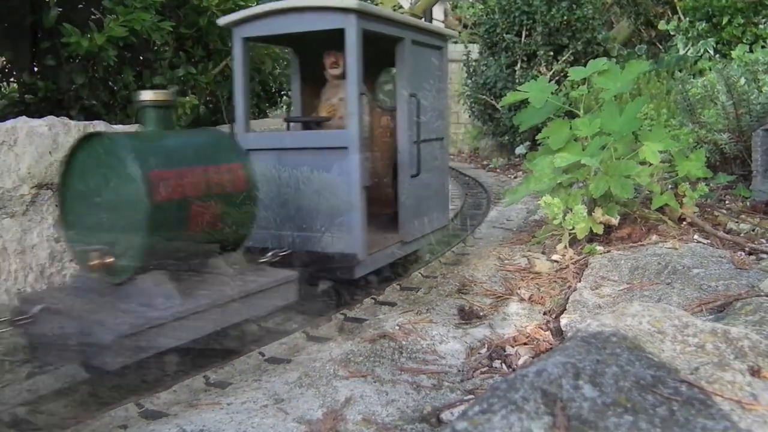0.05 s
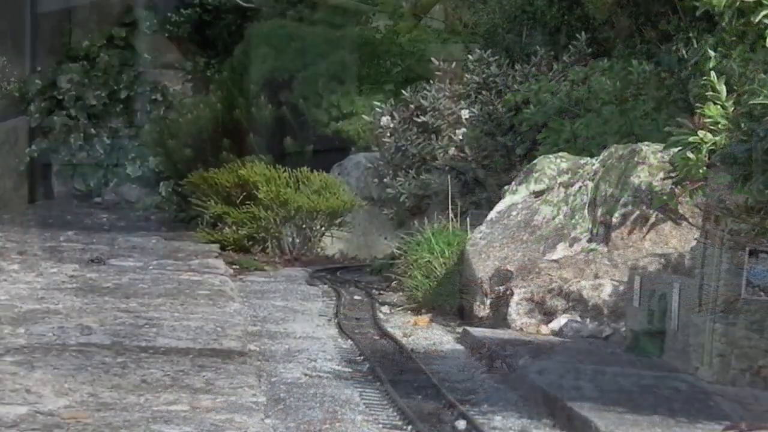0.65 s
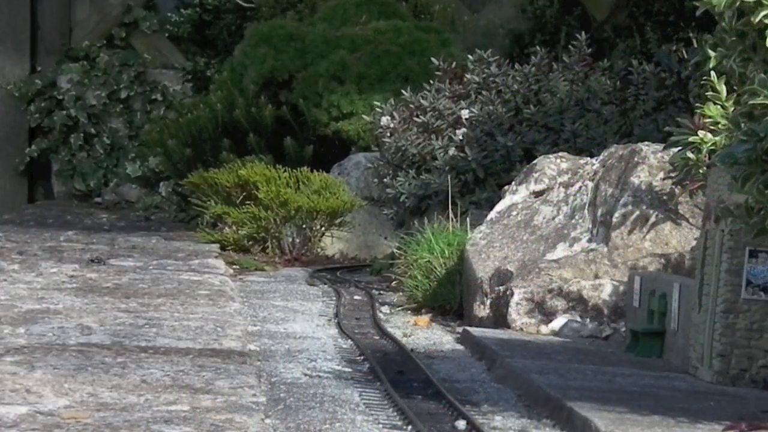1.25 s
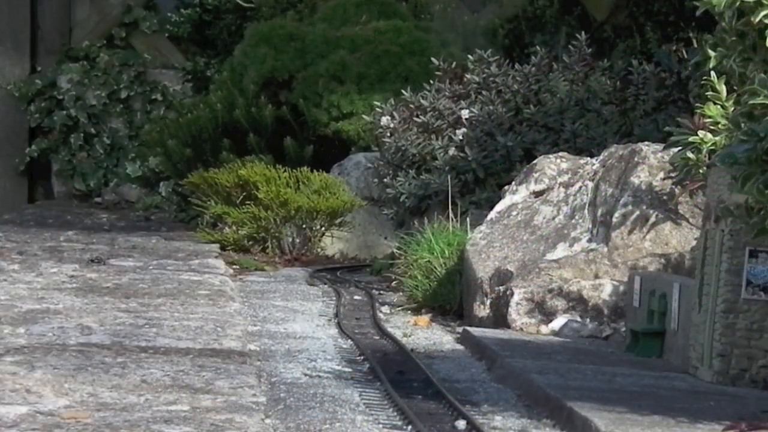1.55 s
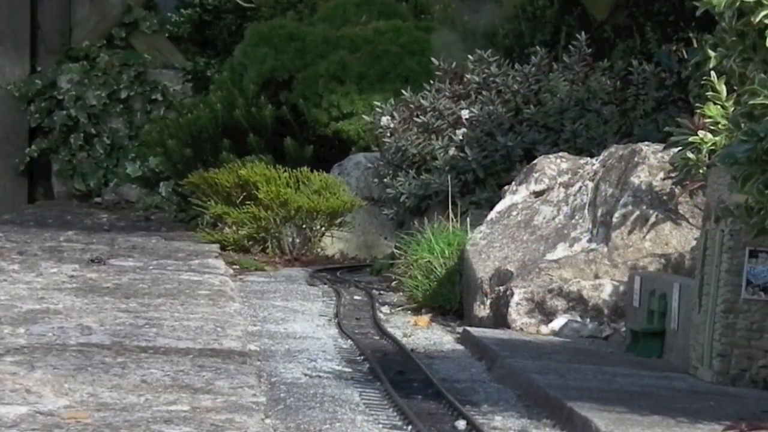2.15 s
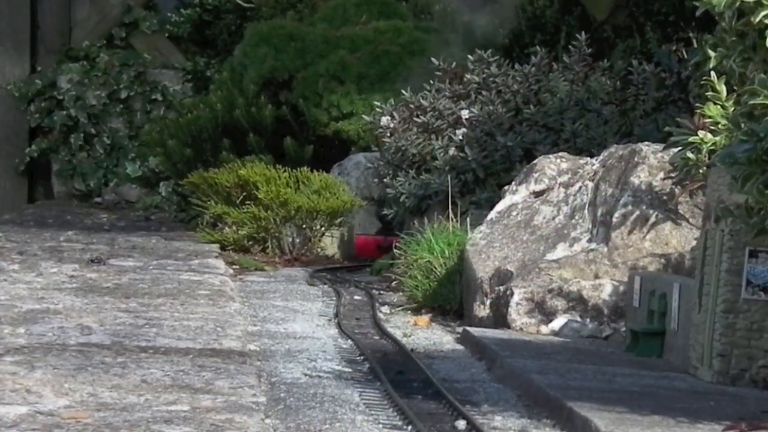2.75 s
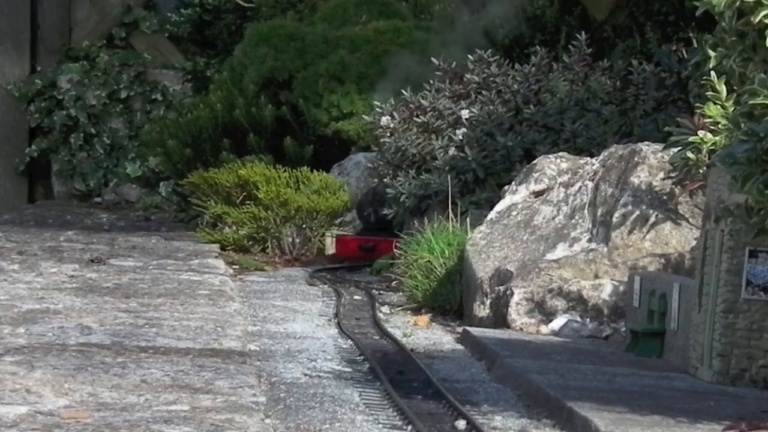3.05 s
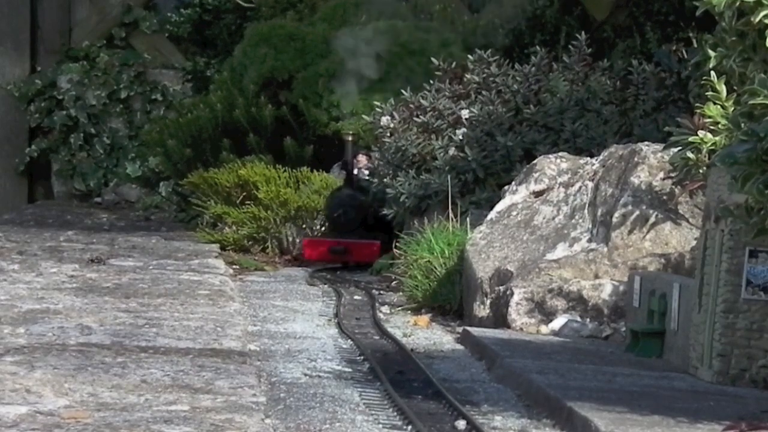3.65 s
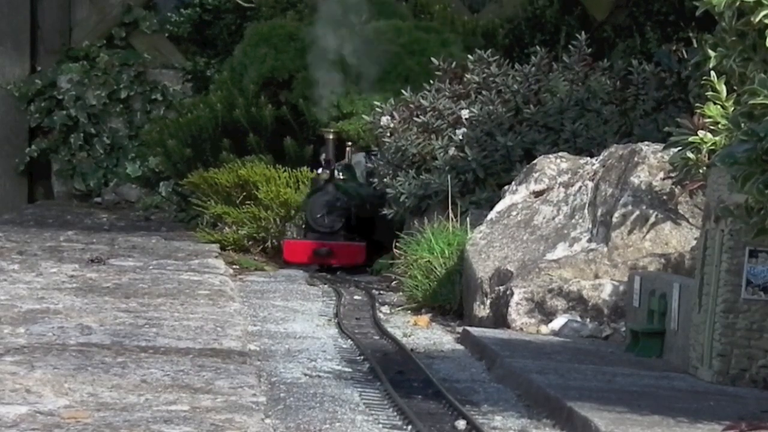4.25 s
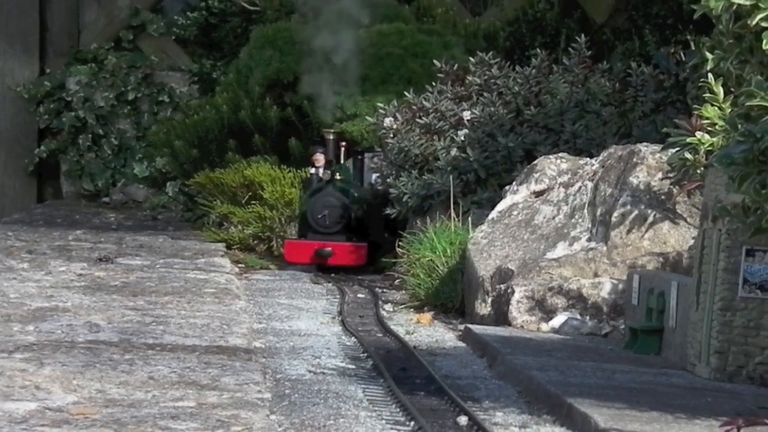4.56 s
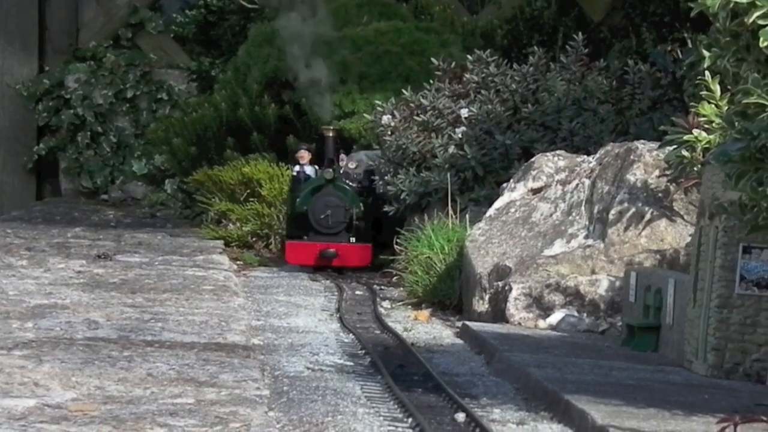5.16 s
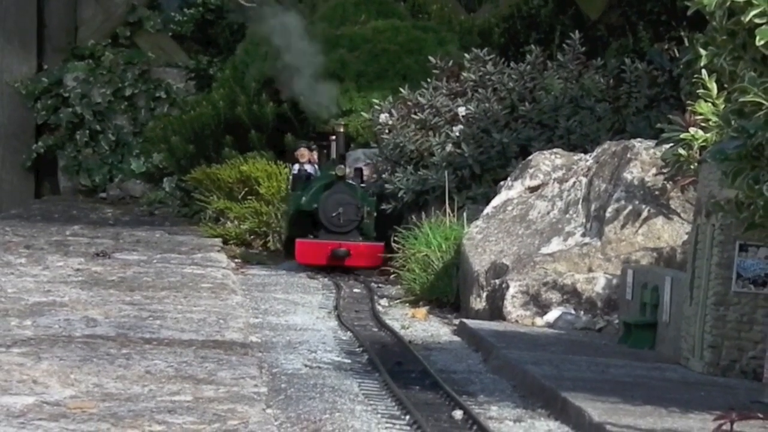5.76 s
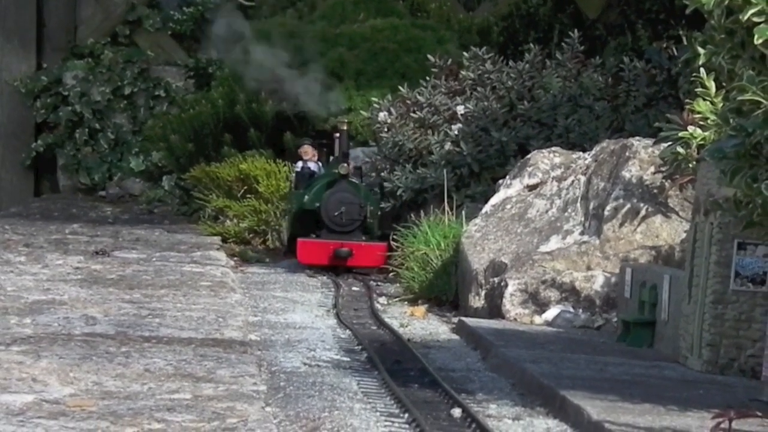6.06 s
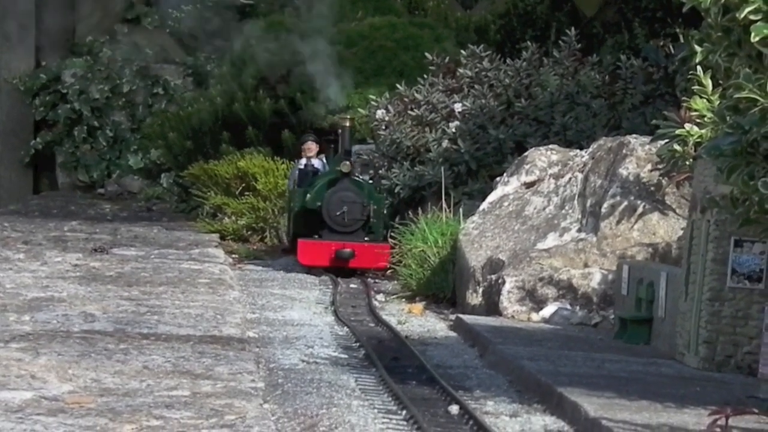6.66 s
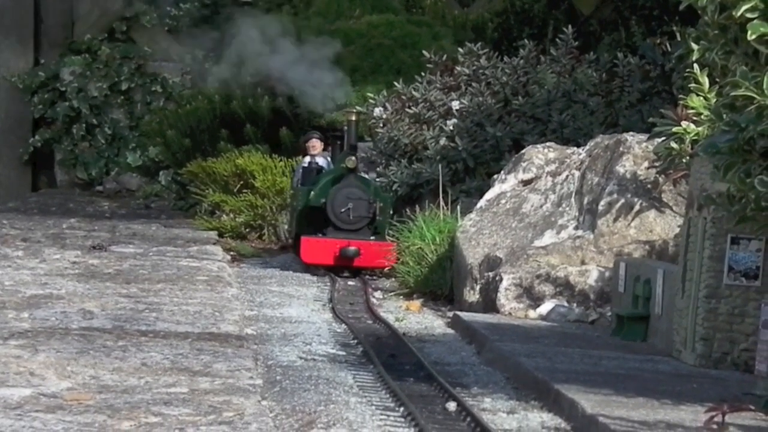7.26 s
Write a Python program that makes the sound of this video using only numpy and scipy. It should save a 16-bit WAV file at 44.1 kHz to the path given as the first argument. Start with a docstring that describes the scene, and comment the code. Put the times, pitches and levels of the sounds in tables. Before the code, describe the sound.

Quick, light, hissy chuffs of a miniature steam engine grow gradually louder along a garden track, over a fluttering burner and occasional water spits.

```python
"""A small live-steam locomotive runs on a garden railway. At first it sounds hollow and lies to the left: a
wheel knocks on a rail joint, wagons rumble and a flange rings. Within a second the scene dissolves into
another, where it is dead ahead and approaching, four chuffs to a wheel turn, each a turbulent steam jet that
hisses and excites the chimney's resonances. From about two seconds the whistling gas burner flutters strongly
and water spits at times. The chuffs grow louder towards the end. Throughout, stone scatters the sound over
quiet outdoor air."""
import sys
import numpy as np
from scipy import signal
from scipy.fft import rfft, irfft
from scipy.io import wavfile
from scipy.ndimage import uniform_filter1d

SR = 44100
rng = np.random.default_rng(int(sys.argv[2]) if len(sys.argv) > 2 else 0)


def to_wav(sig):
    """Store sig (one row per channel, or 1-D mono) as 16-bit WAV at the path in sys.argv[1].

    Samples outside -1..1 are clipped; the rate is SR.
    """
    pcm = np.clip(np.atleast_2d(sig), -1, 1) * 32767
    pcm = np.round(pcm).astype(np.int16)
    wavfile.write(sys.argv[1], SR, pcm.T)  # frames by channels


N = 322812
T, HZ = np.arange(N) / SR, np.fft.rfftfreq(N, 1 / SR)


# chimney resonances: centre_hz, width_hz, level_db
CHIMNEY_MODES = [(1477, 147, 1), (1774, 230, 2.5), (2150, 93, -1.5), (2720, 530, -4), (3034, 680, -4.5)]
# the blast nozzle's thin sizzle: centre_hz, width_hz, level_db
NOZZLE_MODES = [(9130, 850, 9), (10250, 400, -19)]
# broad rush of the blast: frequency_hz, density_db
BLAST_SPECTRUM = [(300, -36), (650, -17), (790, -14.5), (950, -8.5), (1200, -6.5), (1500, 3.5), (2300, 3),
                  (3000, -2.5), (3700, -3.5), (5000, -5), (6500, -34)]
# hiss of the jet: frequency_hz, density_db
JET_SPECTRUM = [(2500, -16), (4300, -11), (5100, 5), (6000, 1), (7400, 0.5), (8400, -5.5), (9200, 0),
                (9700, -2), (10600, 3.5), (11500, -6.5), (12700, -7), (14200, -16), (15500, -15)]
# note and sizzle as the engine comes out from behind rocks: time_s, gain_db
EXPOSURE = [(0, 0), (2, 2), (3.5, -2), (4.7, 1.5), (6, -0.5), (7.3, 3)]

def chuffs(times, valves, chimney_db, hiss_db, note_hz):
    """Jet noise: pulses of wet, turbulent steam hiss and drive the chimney's air column."""
    sputter, exposure = wander(hz=130), amp(over_time(EXPOSURE))
    gulps = amp(1.6 * sputter)
    spray = amp(.8 * sputter + 1.2 * wander(hz=500))
    rush_db = (chimney_db + hiss_db) / 2
    ring_flow = steam_flow(times - .0032, valves, chimney_db, quick=1.18, hold=1.23, fall=1.2, shut_s=.075)
    rush_flow = steam_flow(times - .0019, valves, rush_db, quick=1.8, hold=1.03, fall=.77, shut_s=.22)
    jet_flow = steam_flow(times - .0042, valves, hiss_db, quick=.82, hold=1.04, fall=1.1, shut_s=.23)
    ring = amp(1) * resonant_noise(CHIMNEY_MODES) + amp(-.5) * exposure * chimney_note(times, note_hz)
    sizzle = amp(-5 + 3.5 * wander(hz=13)) * exposure * resonant_noise(NOZZLE_MODES)
    hiss = amp(4.5) * broad_noise(JET_SPECTRUM) + sizzle
    rush = amp(3.5) * broad_noise(BLAST_SPECTRUM)
    return ring_flow * ring + rush_flow * gulps * rush + jet_flow * spray * hiss


def chimney_note(times, note_hz, waver_hz=45, pan_db=1.5):
    """Pipe resonance: each blast sounds the chimney like a badly blown pipe, at its own pitch."""
    beat = np.maximum(np.searchsorted(times, T) - 1, 0)
    pitch_hz = note_hz[beat] + waver_hz * wander(hz=143)
    note = sine(pitch_hz) * amp(3.3 * wander(hz=70))
    return unit(note) * amp([[-pan_db], [pan_db]])


# the four valves, nominal values: rise_s, open_s, fall_db_per_s, chimney_accent_db, hiss_accent_db
VALVE_STROKES = [(0.0036, 0.027, 233, 0, 0), (0.003, 0.032, 235, -0.86, -2), (0.0041, 0.018, 257, 0.2, 2),
                 (0.0036, 0.024, 244, -2.5, -4)]

def steam_flow(times, valves, levels_db, quick, hold, fall, shut_s):
    """Blowdown: a valve opens, then flow decays as the cylinder empties; beats add in power."""
    power, t = np.zeros(N), np.arange(SR // 6) / SR
    for start_s, valve, level_db in zip(times, valves, levels_db):
        rise_s, open_s, fall_db_per_s, _, _ = VALVE_STROKES[valve]
        crispness = np.interp(start_s, [0, .8, 2], [.5, .4, 1.1])  # a hidden engine has softer edges
        opening = (1 - np.exp(-quick * crispness * t / rise_s)) ** 2
        emptying_db = -fall * fall_db_per_s * np.maximum(t - hold * open_s, 0) - 6 * (t / shut_s) ** 4
        add(power, start_s, (opening * amp(level_db + emptying_db)) ** 2)
    return np.sqrt(power)


# crank positions at which the valves open: angle_turns
VALVE_PHASES = [0, .2436, .5032, .7743]

def valve_openings(speed, start_turns):
    """Wheel angle is the integral of speed; each valve angle passed gives one (time_s, valve)."""
    t = T[(T >= speed[0][0]) & (T < speed[-1][0])]
    turns = start_turns + np.cumsum(np.interp(t, *np.transpose(speed))) / SR
    return [(np.interp(turn + angle, turns, t), valve)
            for turn in range(int(turns[-1]) + 1)
            for valve, angle in enumerate(VALVE_PHASES) if start_turns < turn + angle < turns[-1]]


# driving wheels in two scenes that dissolve into each other, the first receding, the second approaching:
# time_s, turns_per_s
RECEDING_SPEED = [(0, 2.77), (.55, 2.77)]
APPROACH_SPEED = [(0.55, 2.647), (1.1, 2.962), (1.35, 2.674), (1.55, 2.837), (2.15, 2.854), (2.35, 3.07),
                  (2.5, 2.653), (3.4, 3.013), (3.7, 2.694), (3.8, 2.894), (4.5, 3.12), (4.6, 2.832),
                  (4.9, 3.025), (5.05, 2.775), (5.2, 3.048), (5.75, 2.947), (6.35, 2.979), (7.32, 2.727)]
# the exhaust along the run: time_s, chimney_db, hiss_db, pitch_hz
EXHAUST_TREND = [(0, -33.5, -35.5, 1770), (0.301, -34.5, -37, 1700), (.55, -31.5, -38, 1750),
                 (.95, -31, -39.2, 1820), (1.5, -32, -37, 1880), (1.9, -30, -36.7, 1795),
                 (2.35, -35.5, -36, 1840), (2.6, -29.5, -37.5, 1750), (3.799, -28.5, -36, 1760),
                 (4.8, -26.5, -35, 1805), (5.6, -25.5, -34.5, 1770), (6.7, -25, -34, 1790),
                 (7.3, -28, -35, 1790)]

def exhaust_beats(spread_db=1.0, spread_hz=30):
    """A quasi-periodic pulse train: the valves set rhythm and accent; strength and pitch vary by chance."""
    openings = valve_openings(RECEDING_SPEED, .432) + valve_openings(APPROACH_SPEED, .39)
    times, valves = map(np.array, zip(*openings))
    trend_s, *columns = np.transpose(EXHAUST_TREND)
    chimney_db, hiss_db, note_hz = (np.interp(times, trend_s, column) for column in columns)
    *_, chimney_accent, hiss_accent = np.array(VALVE_STROKES)[valves].T
    force, detune = rng.standard_normal((len(times), 2)).T
    chimney_db += chimney_accent + spread_db * force
    hiss_db += hiss_accent + spread_db * force / 2
    return times, valves, chimney_db, hiss_db, note_hz + spread_hz * detune


# slugs of water in the blast pipe: peak_s, level_db
WATER_SLUGS = [(1.927, -18), (2.015, -18), (2.630, -17.5), (4.61, -16.5), (5.287, -16), (5.618, -16),
               (6.056, -12), (6.296, -20), (6.812, -12), (7.166, -10), (7.193, -17)]

def spits(swell_s=.0016, splash_db=-10):
    """Impulse excitation: a bursting slug of water splashes and briefly rings the strongest chimney mode."""
    tone, bursts, t = np.zeros(N), np.zeros(N), np.arange(SR // 30) / SR
    shape = (t / swell_s) ** 2 * np.exp(-t / swell_s)
    for time_s, level_db in WATER_SLUGS:
        detune, phase = rng.standard_normal(2)
        pitch_hz = CHIMNEY_MODES[1][0] * (1 + .035 * detune)
        pop = amp(level_db) * shape / shape.max()
        add(bursts, time_s - swell_s, pop)
        add(tone, time_s - swell_s, pop * np.sin(2 * np.pi * (pitch_hz * t + phase)))
    return tone + amp(splash_db) * bursts * broad_noise(BLAST_SPECTRUM)


# the flame's strength: time_s, level_db
FLAME_LEVEL = [(0, -31.5), (.6, -37), (1.1, -34), (1.7, -33.5), (2.1, -29.5), (3, -29.5), (4, -28.5),
               (5, -29), (5.8, -29.5), (6.3, -29.5), (7.3, -26.5)]
# its flutter: time_s, rate_hz, depth_fraction
FLAME_FLUTTER = [(0, 33.7, .3), (1.5, 35.44, 0), (2.1, 39.12, 0.7), (2.5, 37.58, 0.9), (3, 39.7, 0.6),
                 (3.6, 39.02, 0.99), (4.7, 41.13, 0.87), (5.4, 39, 0.82), (6, 39.2, 0.83), (7.3, 39, 0.84)]
# its roar: frequency_hz, density_db
ROAR_SPECTRUM = [(600, -20), (1200, -17.5), (1500, -4), (2000, -1), (2300, 2), (3200, 2.5), (3900, -9.5),
                 (5300, -10), (6000, -17), (7500, -16), (10500, -22.5), (15000, -40)]
# flue resonances: centre_hz, width_hz, level_db
FLUE_MODES = [(1820, 420, -6.5), (2757, 260, 1.5), (4810, 430, -8.5)]

def burner(flare_turns=.23, steady=.26, flue_db=-1):
    """Combustion noise: the flame roars in the resonant flue and flares about forty times a second."""
    time_s, rate_hz, depth = np.transpose(FLAME_FLUTTER)
    turns = np.cumsum(np.interp(T, time_s, rate_hz) * (1 + .0344 * wander(hz=13.1))) / SR
    flares = unit(steady + uniform_filter1d(np.exp(-(turns % 1) / flare_turns), size=90))
    depth = np.interp(T, time_s, depth)
    flutter = 1 - depth + depth * flares
    flicker = amp(.9 * wander(hz=160))
    roar = unit(broad_noise(ROAR_SPECTRUM) + amp(flue_db) * resonant_noise(FLUE_MODES))
    return amp(over_time(FLAME_LEVEL)) * flutter * flicker * roar


def draught(times, delay_s=.055, width_s=.017, sag_db=2.5):
    """Amplitude modulation: the draught of each blast briefly starves the flame."""
    sag, t = np.zeros(N), np.arange(SR // 8) / SR
    for start_s in times:
        add(sag, start_s, np.exp(-((t - delay_s) / width_s) ** 2))
    return amp(-sag_db * sag)


# the gas jet's strength: time_s, level_db
GAS_LEVEL = [(0, -40), (.7, -41), (1.05, -46), (1.2, -38), (1.7, -45.5), (2.2, -44), (2.7, -45),
             (3.1, -39.5), (4.5, -56), (6, -43), (7.3, -40)]
# its whistle: centre_hz, width_hz, level_db
WHISTLE_BANDS = [(4630, 590, -4.5), (5240, 760, -4), (10460, 2100, -13.5)]

def gas_jet(sing_hz=4710, stray_hz=99.4, quiver_hz=45, sing_db=-6.5):
    """Aerodynamic whistle: narrow bands of noise, with a thin, wavering tone that comes and goes."""
    whistle = amp(1.1 * wander(hz=25) + 2.3 * wander(hz=10)) * resonant_noise(WHISTLE_BANDS)
    pitch_hz = sing_hz + stray_hz * wander(hz=4) + quiver_hz * wander(hz=142)
    fitful_db = 7 * np.tanh(wander(hz=5)) + 3.3 * wander(hz=60)
    singing = unit(sine(pitch_hz) * amp(fitful_db))
    return amp(over_time(GAS_LEVEL)) * (whistle + amp(sing_db) * singing)


# wagon wheels and engine wheels on the rails: time_s, level_db
WAGON_LEVEL = [(0, -30.5), (.25, -32.5), (.5, -36), (.75, -36.5), (1, -51), (1.3, -77)]
ENGINE_LEVEL = [(0, -54), (2, -57.5), (4, -56), (5.5, -52), (6.2, -48.5), (6.6, -44), (6.9, -44),
                (7.1, -39), (7.3, -46)]
# the wagons' rumble: frequency_hz, density_db
RUMBLE_SPECTRUM = [(60, -36), (150, -8), (300, -5), (440, -6), (540, -11), (780, -13), (950, -2.5),
                   (1400, 1), (3000, -2.5), (8000, -16)]
# resonances of wagon wheels and engine frame: centre_hz, width_hz, level_db
WHEEL_MODES = [(451, 52, -0.5), (604, 120, 1), (743, 200, 3.5)]
FRAME_MODES = [(130, 120, -21), (221, 31, 3), (333, 54, 0), (470, 400, -8), (617, 110, 0.5), (785, 77, 2),
               (1090, 250, -5.5)]

def rolling():
    """Rolling noise: uneven contact with the rails excites wheels and frame."""
    bumps = amp(1.2 * wander(hz=35))
    rumble = unit(broad_noise(RUMBLE_SPECTRUM) + amp(-9.5) * resonant_noise(WHEEL_MODES))
    wagons = amp(over_time(WAGON_LEVEL)) * rumble
    engine = amp(over_time(ENGINE_LEVEL)) * resonant_noise(FRAME_MODES)
    return bumps * (wagons + engine)


# a wagon wheel meets a rail joint: start_s, level_db
RAIL_JOINT = (.0185, -14.5)

def joint_knock(decay_s=.0046):
    """Impact noise: the wheel's blow is a broadband burst that decays exponentially."""
    start_s, level_db = RAIL_JOINT
    age = np.maximum(T - start_s, 0) / decay_s
    envelope = amp(level_db) * (age > 0) * np.exp(-age)
    return envelope * broad_noise([(100, -22), (400, -2), (3000, 2), (9000, -28)])


# a flange rubbing the curved rail: time_s, level_db
FLANGE_LEVEL = [(0, -60), (.28, -55), (.38, -42), (.5, -48), (.68, -48), (.78, -66), (1.2, -100)]

def flange(pitch_hz=597, waver_hz=9):
    """Friction-driven vibration: a wagon wheel sings one unsteady note through the curve."""
    note = sine(pitch_hz + waver_hz * wander(hz=25))
    return amp(over_time(FLANGE_LEVEL) - 2 * wander(hz=30)) * note


# the opening's colour, hollow with the highest treble cut away: frequency_hz, gain_db
HOLLOW_RESPONSE = [(900, 3), (1200, -8.5), (1550, 6), (1800, 0), (2100, 1), (3200, -5.5), (4700, -2),
                   (7000, 1.5), (11000, -4), (14500, -34)]
# how much of the train has that colour: time_s, share_fraction
HOLLOW_SHARE = [(0, 1), (.3, .8), (.55, .35), (.8, 0)]

def hollow_opening(train, left_db=4):
    """Filtering and crossfade: for the first moments the train is hollow, dull on top and to the left."""
    share = over_time(HOLLOW_SHARE)
    hollow = irfft(rfft(train) * amp(over_hz(HOLLOW_RESPONSE)), N)
    panned = hollow * amp([[left_db / 2], [-left_db / 2]])
    return share * panned + (1 - share) * train


def rocks(train, count=3):
    """Specular reflection: small stone faces mirror the treble along paths that drift as the train moves."""
    treble = signal.sosfilt(signal.butter(2, 1200, "highpass", fs=SR, output="sos"), train)
    paths = rng.uniform([.003, -.0005], [.007, .0005], (count, 2))
    delays_s = [delay_s + drift * (T - T.mean()) for delay_s, drift in paths]
    return sum(np.array([np.interp(T - delay_s, T, side) for side in treble]) for delay_s in delays_s)


def scatter(train, t60_s=.2):
    """Diffuse reflection: rocks, paving and fence return a short spray of echoes."""
    t = np.arange(SR // 3) / SR
    taps = rng.standard_normal((2, len(t))) * (rng.random((2, len(t))) < 2000 / SR)  # 2000 echoes a second
    taps *= amp(-60 * t / t60_s) * (t > .004)
    taps /= np.linalg.norm(taps, axis=1, keepdims=True)
    return signal.fftconvolve(train, taps, axes=1)[:, :N]


# outdoor background: frequency_hz, density_db
AIR_SPECTRUM = [(15, -20), (30, -5), (52, -0.5), (85, 0.5), (120, 0.5), (165, -2), (250, -3.5), (450, -5.5),
                (620, -8.5), (790, 2), (950, -7), (1500, -17.5), (4000, -12), (15000, -16)]

def garden(level_db=-45):
    """Ambient noise: faint, low outdoor air that swells slightly."""
    return amp(level_db + .5 * wander(hz=4)) * broad_noise(AIR_SPECTRUM)


# likeness of the two channels: frequency_hz, coherence_fraction
COHERENCE = [(50, 1), (300, 0.75), (1300, 0.87), (1600, 0.57), (1800, 0.71), (2100, 0.6), (3000, 0.92),
             (4000, 0.54), (5000, 0.25), (7000, 0.52), (9000, 0.17), (10500, 0.43), (11500, 0.49),
             (14500, 0.56)]
# left minus right: frequency_hz, level_db
BALANCE = [(60, 0.0), (92, -0.5), (140, -0.2), (210, -0.086), (330, -0.79), (500, -1), (770, 0.41),
           (1170, -0.28), (1790, -0.22), (2740, -0.027), (4190, 0.49), (6410, 1.5), (9810, 2.1),
           (15000, -0.3)]
# left ahead of right: frequency_hz, phase_rad
PHASE_LEAD = [(100, 0.2), (1300, 0.087), (1800, 0.65), (2200, 0), (2700, 0.81), (3600, 0.023), (5200, 1),
              (6200, 0.3), (7600, 0.99), (9300, 0), (10000, 0), (15000, 0)]

def stereo_noise(gain):
    """Partial coherence: two channels share part of one coloured noise; rms 1."""
    left, independent = rng.standard_normal((2, 2 * len(HZ))).view(complex)
    shared, lean = over_hz(COHERENCE), amp(over_hz(BALANCE) / 2)
    right = (shared * left + np.sqrt(1 - shared ** 2) * independent) * np.exp(-1j * over_hz(PHASE_LEAD))
    return unit(irfft(np.array([left * lean, right / lean]) * gain, N))


def broad_noise(spectrum):
    """Spectral shaping: noise follows a tabulated density."""
    return stereo_noise(amp(over_hz(spectrum)))


def resonant_noise(modes):
    """Forced resonance: noise drives steep-sided modes that add in power."""
    power = sum((amp(db) / (1 + (2 * (HZ - hz) / width) ** 2)) ** 2 for hz, width, db in modes)
    return stereo_noise(np.sqrt(power))


def wander(hz, size=2 ** 14):
    """Low-pass noise: a random drift of rms 1 that rolls off at hz."""
    step_s = N / SR / size
    lowpass = np.exp(-(np.fft.rfftfreq(size, step_s) / hz) ** 2)
    drift = irfft(rfft(rng.standard_normal(size)) * lowpass)
    return np.interp(T, np.arange(size) * step_s, unit(drift))


def sine(pitch_hz):
    """Phase is the integral of frequency."""
    return np.sin(2 * np.pi * np.cumsum(pitch_hz) / SR)


def amp(db):
    """Decibels to amplitude ratio."""
    return 10 ** (np.asarray(db) / 20)


def unit(x):
    """Normalisation to rms 1."""
    return x / np.sqrt(np.mean(x ** 2) + 1e-20)


def over_hz(points):
    """Interpolation on a log-frequency axis."""
    hz, value = np.transpose(points)
    return np.interp(np.log(HZ + 1), np.log(hz + 1), value)


def over_time(points):
    """Interpolation at every sample."""
    return np.interp(T, *np.transpose(points))


def add(mix, start_s, sound):
    """Superposition from a given time."""
    part = mix[max(round(start_s * SR), 0):][:len(sound)]
    part += sound[:len(part)]


def scene():
    """Superposition of the train's direct sound, its reflections and the garden air."""
    times, *beats = exhaust_beats()
    engine = chuffs(times, *beats) + spits() + draught(times) * burner() + gas_jet()
    train = hollow_opening(engine + rolling() + joint_knock() + flange())
    echoes = amp(-18) * rocks(train) + amp(-15) * scatter(train)
    return amp(-.63) * (train + echoes) + garden()


# narrow gaps in the microphone's treble: centre_hz, width_hz
TREBLE_NOTCHES = [(7890, 230), (8800, 130), (11720, 440)]

def record(dry, cutoff_hz=15500):
    """Band limiting: three narrow notches and a steep low-pass filter."""
    gain = np.prod([abs(HZ - hz) / np.hypot(HZ - hz, width / 2) for hz, width in TREBLE_NOTCHES], axis=0)
    notched = irfft(rfft(dry) * gain, N)
    lowpass = signal.firwin(401, cutoff_hz, window=("kaiser", 9), fs=SR)
    return signal.oaconvolve(notched, lowpass[None], "same")


dry = scene()
out = record(dry)
to_wav(out)
```